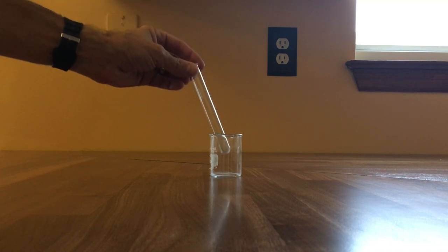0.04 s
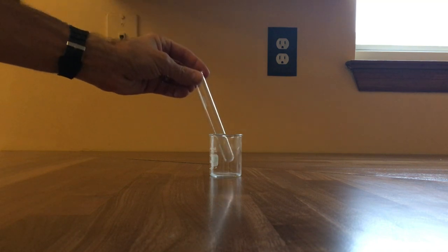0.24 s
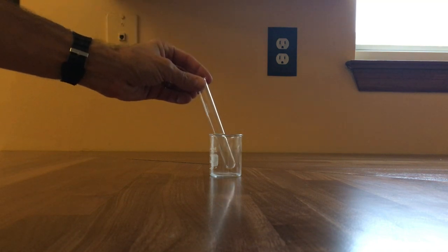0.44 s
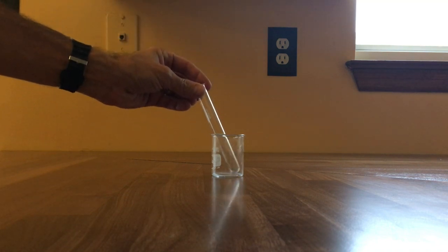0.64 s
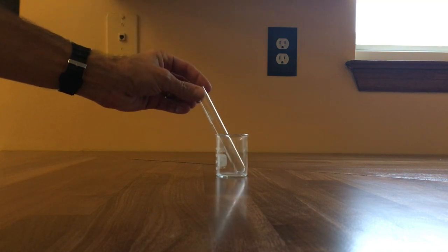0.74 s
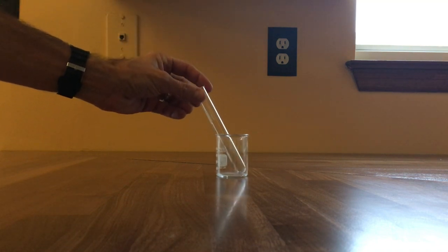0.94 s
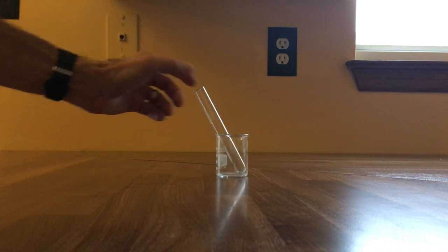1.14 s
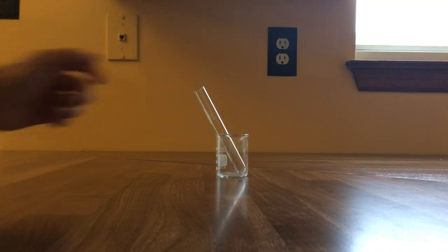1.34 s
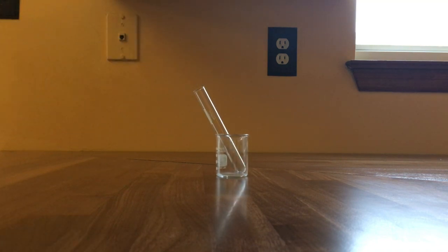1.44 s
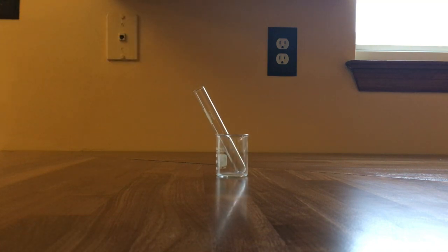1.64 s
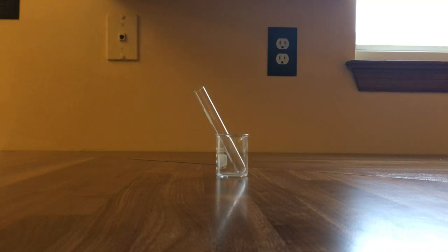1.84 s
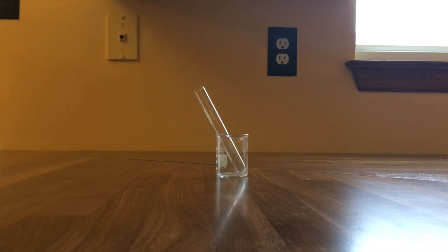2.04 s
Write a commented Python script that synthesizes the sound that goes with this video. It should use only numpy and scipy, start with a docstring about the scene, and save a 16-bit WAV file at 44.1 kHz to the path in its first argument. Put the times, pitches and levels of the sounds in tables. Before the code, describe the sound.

Bright glass clinks ring out as a test tube is lowered into a beaker on a wooden table. It knocks on the bottom and settles softly, then a sleeve faintly brushes, heard close up in a quiet room.

```python
"""Test tube into a beaker

Close on a wooden table in a quiet room, one microphone. A glass tube is lowered into a small beaker:
it clinks on the wall, whose paired modes beat as they ring, knocks on the bottom, then tips against
the rim and damps it. The glass settles with two soft bumps; a sleeve brushes as the arm drops away."""
import sys
import numpy as np
from scipy import signal
from scipy.fft import rfft, irfft
from scipy.io import wavfile

SR = 44100
rng = np.random.default_rng(int(sys.argv[2]) if len(sys.argv) > 2 else 0)


def file_out(sig):
    """Save sig as 16-bit WAV at sys.argv[1]."""
    # one column per channel
    cols = np.atleast_2d(sig).T
    # limit, then scale
    lim = np.clip(cols, -1, 1)
    pcm = np.round(lim * 32767).astype(np.int16)
    wavfile.write(sys.argv[1], SR, pcm)


N = 92610
T = np.arange(N) / SR

# room tone: freq_hz, density_db
ROOM_TONE = [(20, -27), (40, -11.5), (62, -2.5), (100, -3), (150, -2), (230, -3.5), (330, -10.5),
             (450, -14.5), (620, -15), (900, -21.5), (1300, -25.5), (2000, -32), (4000, -39.5), (9000, -46),
             (16000, -48.5)]
# faint steady tones: pitch_hz, level_db, start_s
HUM_TONES = [(66, -66.5, 0), (120, -81, 0), (1058, -77, .9)]
# reflections off the table and near walls: delay_s, level_db
REFLECTIONS = [(.0042, -14.5), (.0098, -17), (.0145, -23.5)]
# the room's decay: freq_hz, t60_s
ROOM_DECAY = [(200, 0.394), (700, 0.48), (1400, 0.41), (3000, 0.53), (5500, 0.44), (9000, 0.34),
              (15000, 0.28)]
# the sleeve's movement: time_s, level_db
SLEEVE_ENVELOPE = [(1.25, -89.5), (1.5, -77.5), (1.65, -73.5), (1.788, -72.5), (1.805, -60), (1.845, -62),
                   (1.9, -69.5), (2.0, -75.5), (2.1, -75.5)]
# cloth rubbing: freq_hz, density_db
SLEEVE_SPECTRUM = [(300, -18), (1200, 2), (3500, -1.5), (6000, -4), (9000, -8), (13000, -19),
                   (16000, -23.5)]
# the tube's end slipping on the bottom: start_s, pitch_hz, level_db
TUBE_SLIPS = [(0.789, 3130, -42), (0.7952, 3400, -51), (0.8583, 3800, -53.5)]
# knocks on the table and their early room echoes:
# start_s, level_db, dulling_db_per_octave, focus_hz, wood_db
KNOCKS_AND_ECHOES = [(0.085, -54, 1, 743, -11), (0.2006, -42.5, 5, 1240, -18),
                     (0.4932, -31.5, 4, 1300, -15), (0.5112, -25, 10.5, 1310, -19.5),
                     (0.570, -45, 4, 1350, -13.5), (0.6545, -44, 7, 1300, -1), (0.6741, -19, 0, 1590, -9),
                     (0.6865, -32.5, 10, 690, -11.5), (0.696, -40, 0.5, 1260, 8.5),
                     (0.836, -36, 21, 715, -11), (0.851, -44.5, 19.5, 676, -31), (1.024, -46, 13, 715, -19),
                     (1.0375, -43, 17.5, 662, -27), (1.058, -43, 24.5, 560, -21)]
# the beaker standing on the table: pitch_hz, level_db, t60_s
BODY_MODES = [(324.6, -21, 0.062), (465, -19.5, 0.13), (573, -20.5, 0.073), (654.5, -9.5, 0.1),
              (712, -14.5, 0.084), (943, -13.5, .06), (1143, -11.5, .04), (1251, -8, 0.03),
              (1309, -5.5, 0.066), (1492, -4.5, .042), (1728, -10.5, 0.044), (2180, -9, 0.051),
              (2373, -19.5, .03)]
# dull rush of the wood: freq_hz, density_db
WOOD_SPECTRUM = [(100, -36), (250, -3), (750, -3.5), (1000, 0), (1400, 2), (1950, -7), (2600, -10.5),
                 (3600, -14.5), (8000, -60)]
# the tube and the beaker's base clattering: pitch_hz, level_db, t60_s
CLATTER_MODES = [(3663, -27, 0.044), (4290, -18.5, 0.041), (4770, -11.5, .06), (5180, -3.5, 0.072),
                 (5390, 4.5, .04), (5456, -9.5, 0.069), (5830, -13.5, .05), (5830, -1.5, 0.047),
                 (6000, -20.5, 0.026), (6320, -9.5, .055)]
# crunch within each clatter: freq_hz, density_db
CRUNCH_SPECTRUM = [(2500, -29), (4000, -10.5), (4800, -10.5), (5200, 4), (6200, -0.5), (6900, -18),
                   (9000, -43)]
# the tube's own note: pitch_hz, level_db, t60_s
TUBE_MODES = [(9792, -41, 0.037), (9880, -41.5, 0.178), (9800, -40.5, 0.0486), (10750, -45, 0.055)]
# contact tick: freq_hz, density_db
TICK_SPECTRUM = [(300, -29), (1500, 1.5), (2400, -8), (3600, 2.5), (5800, -0.5), (7000, -2.5), (8100, 0.5),
                 (9200, -1), (11200, -27), (13000, -10.5), (14600, -9.5), (16000, -42)]
# tube meeting beaker: start_s, ring_db, tilt_db_per_octave, twin_bias_db, tick_db, clatter_db
CONTACTS = [(0.0, -59, -16, 1.5, -81, -90), (0.085, -62.5, -7.5, 6, -76, -100),
            (0.2006, -38, -0.64, 2.5, -35.5, -55), (0.493, -34.5, 3, 0, -32.5, -40.5),
            (0.5054, -41, 6, 1, -31, -35.5), (0.6545, -51, -25, -5.5, -52, -57.5),
            (0.6757, -59, -9, 11, -29.5, -39.5), (0.6942, -43, 7.5, -7, -26, -31.5)]
LOW_TWIN_HZ, HIGH_TWIN_HZ = 2922, 2980.5
# the beaker's wall: pitch_hz, level_db, t60_s, twin_sign
WALL_MODES = [(LOW_TWIN_HZ, 0, 0.73, -1), (HIGH_TWIN_HZ, -1.5, 0.99, 1), (7812, 3, 0.12, 1),
              (7930, -3, 0.11, -1), (8090, -9.5, 0.0803, -1), (12640, -16.5, 0.11, -1),
              (12600, -18.5, 0.11, 1), (13610, -24, .12, -1), (13780, -23, 0.12, 1), (14400, -27.5, .1, -1),
              (15650, -38, .15, -1)]


def amp(db):
    """Decibels to gain."""
    return 10 ** (np.asarray(db) / 20)


def value_at(curve, hz):
    """A curve's value at hz, on a log-frequency axis."""
    curve_hz, values = np.transpose(curve)
    return np.interp(np.log(hz + 1), np.log(curve_hz + 1), values)


def add(mix, start_s, sound):
    """Mixes a sound in at start_s."""
    part = mix[max(round(start_s * SR), 0):][:len(sound)]
    part += sound[:len(part)]


def noise(spectrum):
    """Noise of the given colour, rms 1."""
    gains = amp(value_at(spectrum, np.fft.rfftfreq(N, 1 / SR)))
    coloured = irfft(rfft(rng.standard_normal(N)) * gains, N)
    return coloured / coloured.std()


def struck(modes, sign=-1):
    """Half a second of dying sines, of alternating (-1) or equal (1) sign."""
    t = T[:SR // 2]
    return sum(sign ** k * amp(db - 60 * t / t60_s) * np.sin(2 * np.pi * hz * t)
               for k, (hz, db, t60_s) in enumerate(modes))


def room_tone(noise_db=-56, fade_s=0.05):
    """Low room noise with a faint hum; a thin whine fades in later."""
    hum = np.zeros(N)
    for hz, rms_db, start_s in HUM_TONES:
        fade_in = np.clip((T - start_s) / fade_s, 0, 1)
        hum += amp(rms_db) * fade_in * np.sqrt(2) * np.sin(2 * np.pi * (hz * T + rng.random()))
    return amp(noise_db) * noise(ROOM_TONE) + hum


def room_tail(sound, delay_s=0.008):
    """The room answers with a diffuse tail, each band dying at its own speed."""
    hz, t, bands = signal.stft(rng.standard_normal(SR), SR, nperseg=256)
    decay = amp(-60 * t / value_at(ROOM_DECAY, hz)[:, None])
    _, tail = signal.istft(bands * decay, SR, nperseg=256)
    out = np.zeros(N)
    add(out, delay_s, signal.fftconvolve(sound, tail / np.linalg.norm(tail)))
    return out


def with_reflections(direct):
    """The direct sound reaches the microphone first, then its bounces off table and walls."""
    out = direct.copy()
    for delay_s, level_db in REFLECTIONS:
        add(out, delay_s, amp(level_db) * direct)
    return out


def sleeve():
    """Cloth slides softly, then brushes once."""
    level_db = np.interp(T, *np.transpose(SLEEVE_ENVELOPE))
    return amp(level_db) * noise(SLEEVE_SPECTRUM)


def tube_slips(decay_s=0.0031, skirt_octaves=1.16):
    """Tiny dry squeaks of glass sliding on glass as the tube settles."""
    out = np.zeros(N)
    for start_s, hz, level_db in TUBE_SLIPS:
        band = [(hz / 2 ** skirt_octaves, -40), (hz, 0), (hz * 2 ** skirt_octaves, -40)]
        add(out, start_s, amp(level_db) * noise(band) * np.exp(-T / decay_s))
    return out


def table_knocks(body_hz=674, focus_db=8, focus_octaves=0.16, rise_s=0.0011, wood_decay_s=0.0082):
    """The beaker's knocks on the wood and their early room echoes; each favours modes near one pitch."""
    out, rush, t = np.zeros(N), noise(WOOD_SPECTRUM), T[:SR // 2]
    hz, mode_db, t60_s = np.transpose(BODY_MODES)
    octaves_above = np.maximum(np.log2(hz / body_hz), 0)
    attack = 1 - np.exp(-t / rise_s)
    for start_s, level_db, dulling, focus_hz, wood_db in KNOCKS_AND_ECHOES:
        focus = np.exp(-(np.log2(hz / focus_hz) / focus_octaves) ** 2)
        excited_db = mode_db + focus_db * focus - dulling * octaves_above
        body = struck(zip(hz, excited_db, t60_s), sign=1)
        wood = amp(wood_db) * np.exp(-t / wood_decay_s) * np.roll(rush, rng.integers(N))[:len(t)]
        add(out, start_s, amp(level_db) * (body + wood) * attack)
    return out


def glass_clatter(crunch_db=-2, crunch_decay_s=0.011, landing_s=0.675):
    """Well-damped glass modes and a short crunch at each contact; the tube sings once as it lands."""
    out, modes, grit = np.zeros(N), struck(CLATTER_MODES), noise(CRUNCH_SPECTRUM)
    for start_s, *_, clatter_db in CONTACTS:
        crunch = np.exp(-T / crunch_decay_s) * np.roll(grit, rng.integers(N))
        add(out, start_s, amp(clatter_db) * modes)
        add(out, start_s, amp(clatter_db + crunch_db) * crunch)
    add(out, landing_s, struck(TUBE_MODES))
    return out


def contact_ticks(decay_s=0.0009, tail_decay_s=0.011, tail_db=-21):
    """Glass on glass: a very short, bright burst at each contact."""
    out, grit = np.zeros(N), noise(TICK_SPECTRUM)
    envelope = np.exp(-T / decay_s) + amp(tail_db) * np.exp(-T / tail_decay_s)
    for start_s, *_, tick_db, _ in CONTACTS:
        add(out, start_s, amp(tick_db) * envelope * np.roll(grit, rng.integers(N)))
    return out


def beaker_ring(lean_s=0.7515, damping_db_per_s=307):
    """Each clink adds energy to the wall's beating twin modes, until the leaning tube damps them."""
    out = np.zeros(N)
    for hz, mode_db, t60_s, twin_sign in WALL_MODES:
        kicks = np.zeros(N)
        octaves_up = np.log2(hz / LOW_TWIN_HZ)
        for start_s, ring_db, tilt, twin_bias_db, _, _ in CONTACTS:
            # where the tube lands decides which twin gets more
            kick_db = ring_db + mode_db + tilt * octaves_up + twin_bias_db * twin_sign
            add(kicks, start_s, amp([kick_db]) ** 2)
        kept_per_sample = amp(-60 / (t60_s * SR)) ** 2
        energy = signal.lfilter([1], [1, -kept_per_sample], kicks)
        out += np.sqrt(energy) * np.sin(2 * np.pi * (hz * T + rng.random()))
    return out * amp(-damping_db_per_s * np.maximum(T - lean_s, 0))


def scene():
    """Glass and table close to one microphone, the room behind them."""
    ring, ticks = beaker_ring(), contact_ticks()
    clatter = glass_clatter() + tube_slips()
    knocks = table_knocks()
    close = ring + with_reflections(ticks + clatter + knocks)
    reverb = room_tail(amp(-18) * ring + amp(-10) * (ticks + knocks) + amp(-11.5) * clatter)
    return (close + reverb + room_tone() + sleeve())[None]


def record(dry):
    """The recorder cuts the highest treble."""
    lowpass = signal.firwin(255, cutoff=16200, window=("kaiser", 8), fs=SR)
    return signal.oaconvolve(dry, lowpass[None], "same")


dry = scene()
out = record(dry)
file_out(out)
```